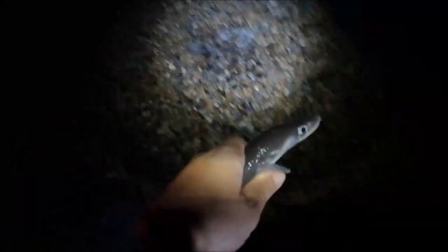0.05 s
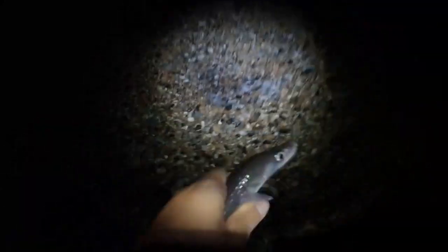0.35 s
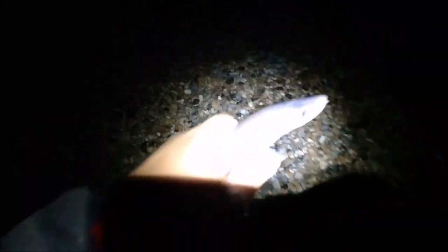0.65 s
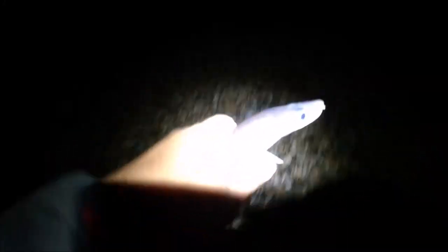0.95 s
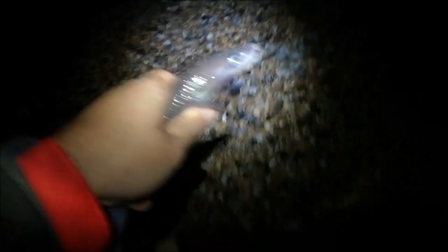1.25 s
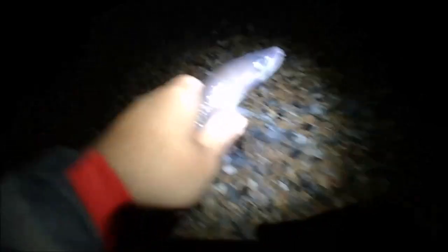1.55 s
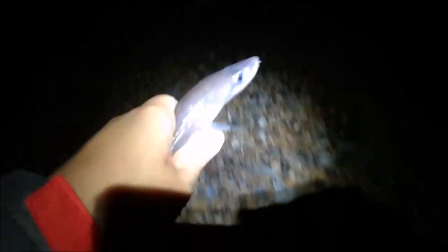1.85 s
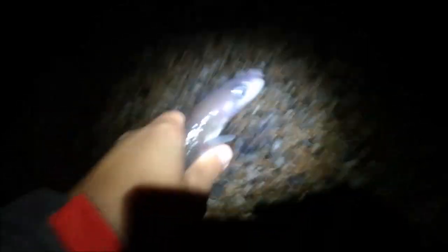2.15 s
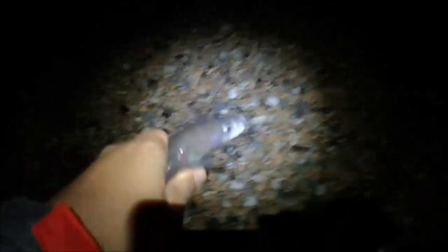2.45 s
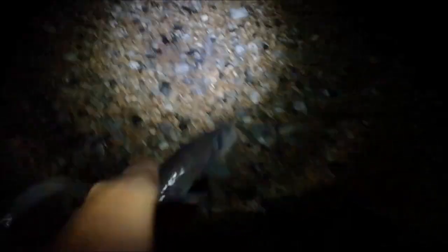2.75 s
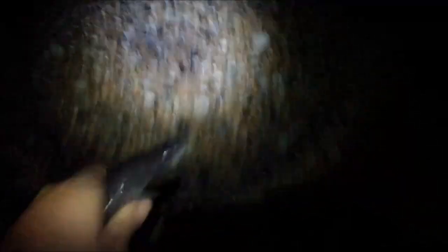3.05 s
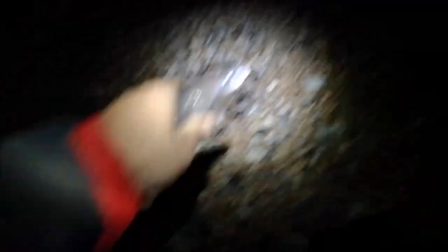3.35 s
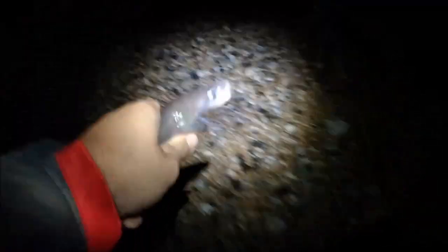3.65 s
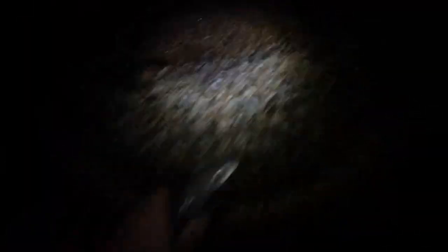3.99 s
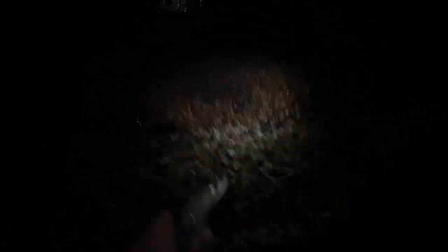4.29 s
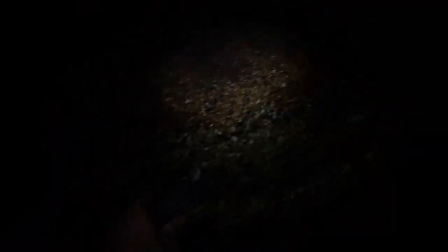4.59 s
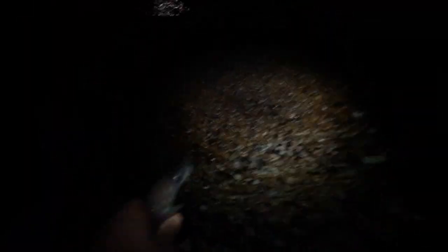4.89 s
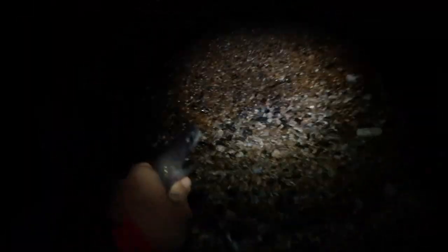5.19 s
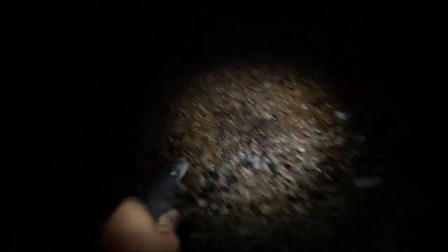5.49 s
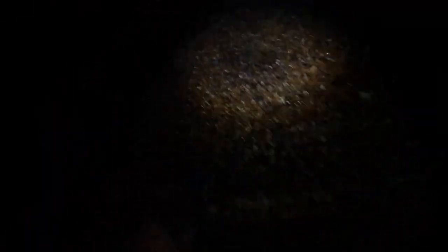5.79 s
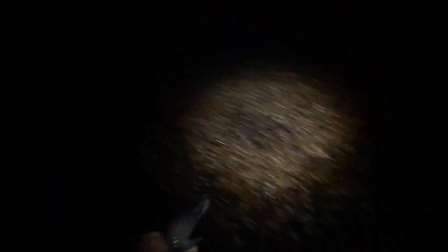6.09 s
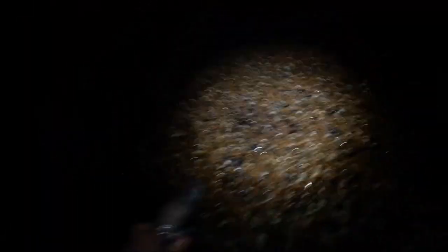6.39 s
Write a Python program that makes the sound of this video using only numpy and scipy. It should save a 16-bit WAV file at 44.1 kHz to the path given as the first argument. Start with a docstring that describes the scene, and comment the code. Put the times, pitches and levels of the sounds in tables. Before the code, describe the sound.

Footsteps crunch on a loose pebble beach, close to the microphone, for about six and a half seconds. There are eleven steps, at roughly 0.2, 0.9, 1.3, 1.8, 2.4, 3.0, 3.6, 4.1, 4.7, 5.4 and 6.0 seconds, gradually slower and a little lighter. Each is a gritty crunch over a soft low thud. Single stones clack sharply, most clearly around 0.2, 1.2, 1.9 and 2.4 seconds, and again near 4.6. Soles scuff between steps, especially around 2.5 and 3.1 seconds, and tiny stones tick faintly as they settle early on. Further off, a soft wave drains during the first two seconds, leaving a hiss in the shingle. From about 3.5 seconds the next wave builds, reaching a fuller wash with a low roar near 6 seconds. One brief, faint puff of wind rumbles on the microphone at about 5.8 seconds.

```python
"""A shingle beach at night: someone walks eleven steps, slowing down.
Each footfall loads a granular bed, whose many slipping contacts sum to a crunch over a low thud.
Single stones, kicked or settling, ring on impact; others rasp by friction under the sole.
Behind, the sea hisses through the shingle as one wave drains and the next builds up.
One puff of wind rumbles on the microphones."""
import sys
import numpy as np
from scipy import signal
from scipy.fft import rfft, irfft, next_fast_len
from scipy.io import wavfile

SR = 44100
rng = np.random.default_rng(int(sys.argv[2]) if len(sys.argv) > 2 else 0)


def persist_wave(psi):
    """Save psi, clipped to +-1, as 16-bit WAV."""
    counts = np.round(np.clip(psi, -1, 1) * 32767).astype(np.int16)
    wavfile.write(sys.argv[1], SR, np.atleast_2d(counts).T)


N = 283695
TIME = np.arange(N) / SR


# footfalls: (time [s], heel rise [s], heel level [dB], time to full weight [s], full weight [dB],
# fade [dB/s], time to rest [s], fine grit [dB], bed thud [dB], big pebbles [dB])
FOOTFALLS = [(0.159, 0.0045, -31, .03, -27.5, 41, 0.33, 8.5, 1.5, -2),
             (0.883, .003, -29.5, .043, -21, 268, 0.066, 8.5, 4, 2),
             (1.301, 0.022, -25, 0.094, -21.5, 135, 0.19, 5.5, 3, -0.5),
             (1.843, 0.0224, -28.5, .052, -21, 71, 0.11, 0, 2.5, 3),
             (2.363, 0.0018, -28.5, 0.0157, -23.5, 28, 0.065, -6, -0.5, 0.5),
             (3.026, 0.014, -31, 0.093, -27, 45, .145, 2, 0.5, 1),
             (3.584, 0.0039, -36.5, 0.063, -25.5, 188, 0.2, 7.5, 6, 2.5),
             (4.094, .002, -33.5, 0.11, -33.5, 15, 0.22, 14, 8.5, 3.5),
             (4.745, 0.021, -36.5, 0.084, -27, 30, 0.21, 10.5, 4, 3),
             (5.368, 0.01, -42, 0.12, -30.5, 45, 0.2, 12, 6.5, 1),
             (6.023, 0.0055, -33.5, 0.069, -26.5, 29, 0.15, 2.5, 3, -3)]
# a foot grazes, slips or pushes off: (centre time [s], level [dB], spread [s], fine grit [dB])
FOOT_SCUFFS = [(0.705, -41.5, 0.022, 0), (0.805, -36, 0.052, -10.5), (0.862, -32, 0.011, 10),
               (1.085, -57, 0.017, -2), (1.57, -38, 0.034, -6.5), (1.691, -37.5, 0.046, -4),
               (2.356, -32.5, .004, -6), (2.519, -25.5, 0.044, -8.5), (2.63, -40.5, 0.041, -11),
               (2.99, -40, 0.024, -11), (3.103, -23, 0.01, 0), (3.243, -29.5, 0.014, -5),
               (3.51, -41.5, .05, -4.5), (4.41, -43.5, 0.017, 5), (4.69, -43.5, 0.059, -11)]
def tread(settle_db=-16.5, settle_db_per_s=59.5, rest_db_per_s=173, grit_db_per_s=43.5):
    """Incoherent sources add in power: steps and scuffs give the crunch level and its grit share in dB."""
    moves = [(from_db(db) * swell(s, spread_s), grit_db) for s, db, spread_s, grit_db in FOOT_SCUFFS]
    for s, bite_s, heel_db, roll_s, weight_db, fade_db_per_s, rest_s, grit_db, _, _ in FOOTFALLS:
        age = np.maximum(TIME - s, 0)
        press_db = np.interp(age, [bite_s, roll_s], [heel_db, weight_db])
        loaded, resting = np.maximum(age - roll_s, 0), np.maximum(age - rest_s, 0)
        sole = from_db(press_db - fade_db_per_s * loaded - rest_db_per_s * resting)
        settling = from_db(press_db + settle_db - settle_db_per_s * loaded)
        bite = np.minimum(age / bite_s, 1)
        crushed_db = grit_db_per_s * np.minimum(age, rest_s)   # fine grit is crushed first
        moves.append((bite * np.hypot(sole, settling), grit_db - crushed_db))
    crunch_db = 10 * np.log10(sum(level ** 2 for level, _ in moves) + 1e-12)
    fine_db = 10 * np.log10(sum((level * from_db(grit_db)) ** 2 for level, grit_db in moves) + 1e-12)
    return crunch_db, fine_db - crunch_db


def contacts(crunch_db, per_s, size_db):
    """Slips form a Poisson process of even power, denser under load; many are small and few large."""
    rate = per_s * from_db((crunch_db + 29) * .7)
    sizes = from_db(size_db * np.minimum(rng.exponential(1, N), 3))
    slips = rng.random(N) < rate / SR
    return rms_one(slips * sizes / np.sqrt(rate))


# spectrum of crushed shingle: (frequency [Hz], relative density [dB])
CRUNCH_SPECTRUM = [(40, -28.5), (90, -28.5), (178, -12), (270, -16.5), (510, -17.5), (880, -10),
                   (2000, -6.5), (3100, -7), (3950, -2), (5100, -4.5), (8000, -11.5), (11000, -21.5),
                   (13500, -19.5), (16000, -18)]
# highest treble of the crunch: (time [s], gain [dB])
CRUNCH_TREBLE = [(3.1, -2), (4.8, 3.5)]
# ground sound at the two microphone ports: (frequency [Hz], left minus right [dB])
GROUND_BALANCE = [(280, -1), (720, 11), (1300, 7), (2200, 5), (3150, 0.5), (3950, 4.5), (5050, -9),
                  (7500, 8), (9200, 6), (10800, 3), (15500, 8.5)]
def footsteps(crunch_db, grit_db, scatter_db=2.5):
    """Brief impacts excite a broad spectrum: grit adds treble, big pebbles mids, the bed a thud."""
    thud_db, pebble_db = in_time([(s, thud, pebble) for s, *_, thud, pebble in FOOTFALLS])
    top_db, = in_time(CRUNCH_TREBLE)
    light_db = 0.33 * np.minimum(crunch_db + 57, 0)   # a light touch leaves the deep, big stones at rest
    clicks = contacts(crunch_db, per_s=2000, size_db=1.5) * from_db(0.72 * drift(170))
    spray = from_db(scatter_db) * scatter(clicks, t60=.035)
    drives = [np.hypot(clicks, spray) * rng.standard_normal((2, N)) for _ in range(3)]
    bands_hz = 1000 * 2 ** (np.arange(-14, 13) / 3)   # third octaves
    out = np.zeros((2, N))
    for k, (hz, gain) in enumerate(zip(bands_hz, band_gains(CRUNCH_SPECTRUM, bands_hz))):
        grit = at_hz([(4200, 0), (12000, 0.94), (16000, 0.7)], hz) * grit_db
        pebble = at_hz([(400, 0.24), (900, 0.41), (2100, 1), (3600, 0.01)], hz) * pebble_db
        thud = at_hz([(400, 1.0), (900, 0)], hz) * thud_db
        light = at_hz([(250, 0), (500, 1), (800, 1), (1600, 0)], hz) * light_db
        top = at_hz([(10000, 0), (14000, 1)], hz) * top_db
        level = gain * from_db(crunch_db + grit + pebble + thud + light + top)
        band = rms_one(band_pass(drives[k % len(drives)], hz, hz / 4, order=3))
        out += level * at_ports(band, hz, GROUND_BALANCE)
    return out


def clacks(crunch_db, level_db=-13.0, width_hz=330, count=16):
    """Damped resonance: within each crunch, pebbles ring for milliseconds, each at its own pitch."""
    clicks = contacts(crunch_db, per_s=300, size_db=2.0) * rng.choice([-1, 1], (2, N))
    struck = rng.integers(0, count, N)
    pitches_hz = np.geomspace(2700, 5200, count)
    rings = sum(band_pass(clicks * (struck == k), hz, width_hz) for k, hz in enumerate(pitches_hz))
    return from_db(crunch_db + level_db) * rms_one(rings)


# single stones knocking together: (time [s], level [dB], pitch [Hz])
STONE_KNOCKS = [(0.1617, -20, 4120), (0.2094, -14.5, 4000), (0.4539, -30, 3660), (0.5676, -28, 4070),
                (0.597, -29.5, 3900), (0.857, -36, 4250), (0.8884, -33, 4150), (1.0555, -31.5, 3800),
                (1.2203, -12.5, 3620), (1.2334, -29, 4000), (1.282, -22, 3840), (1.5924, -27.5, 3830),
                (1.8612, -14.5, 4060), (1.8801, -22, 3880), (1.8944, -11, 4000), (2.3727, -15.5, 4090),
                (2.3894, -16, 3870), (2.4094, -14.5, 3800), (2.7897, -30.5, 4000), (3.0353, -22, 3950),
                (4.0961, -31, 3900), (4.577, -18.5, 3790), (4.6657, -25, 3920)]
def stones(ring_db=-2.5, crack_db=-1.5, spray_db=-1.0):
    """Impact excitation: a chattering contact cracks and rings a stone, and the bed reflects the sound."""
    out, size = np.zeros((2, N)), SR // 16
    click = signal.unit_impulse(size)
    contact = scatter(click, t60=.007)
    spray = from_db(spray_db) * scatter(click, t60=.052)
    for s, level_db, hz in STONE_KNOCKS:
        drive = np.hypot(contact, spray) * rng.standard_normal((2, size))
        ring = band_pass(click + drive, hz, width_hz=700)
        crack = band_pass(drive, hz=4500, width_hz=4400, order=1)
        crack = band_pass(crack, hz=9500, width_hz=17000)
        knock = from_db(ring_db) * peak_one(ring) + from_db(crack_db) * peak_one(crack)
        start = round(s * SR)
        out[:, start:start + size] += from_db(level_db) * knock
    return out


# stones rasping underfoot: (centre time [s], left level [dB], pitch [Hz], bandwidth [Hz], spread [s])
STONE_RASPS = [(.348, -39, 12300, 500, 0.0027), (0.374, -36, 12000, 500, 0.0027),
               (0.688, -36, 12000, 500, 0.0024), (2, -40, 14500, 1790, 0.0088),
               (2.468, -44, 11300, 251, .007), (4.807, -26.5, 2050, 200, 0.013),
               (6.11, -32, 1000, 400, 0.018)]
def scrapes(right_db=-6.0):
    """Sliding friction: a stone dragged over its neighbours rasps in one band, swelling and fading."""
    out, size = np.zeros((2, N)), SR // 4
    for s, level_db, hz, width_hz, spread_s in STONE_RASPS:
        envelope = signal.windows.gaussian(size, spread_s * SR)
        rasp = rms_one(band_pass(rng.standard_normal((2, size)), hz, width_hz))
        start = round(s * SR) - size // 2
        out[:, start:start + size] += from_db(level_db) * envelope * rasp
    return out * from_db([[0], [right_db]])


# heels and soles bumping on the bed: (time [s], peak level [dB])
BED_THUMPS = [(0.168, -61), (0.954, -40), (1.315, -43), (1.391, -48), (1.94, -46), (2.368, -43),
              (3.099, -48), (3.582, -40.5), (3.623, -39), (3.705, -49), (4.092, -48)]
def thumps(hz=172, width_hz=130):
    """Heavy damping: the impulse response of the packed bed lasts two or three low cycles."""
    out, size = np.zeros(N), SR // 8
    bump = peak_one(band_pass(signal.unit_impulse(size), hz, width_hz))
    for s, peak_db in BED_THUMPS:
        start = round(s * SR)
        out[start:start + size] += from_db(peak_db) * bump
    return out


def trickle(per_s=24, level_db=-56, t60=0.023, hz=7000, width_hz=4500, middle_s=0.55, spread_s=0.85):
    """Granular relaxation: during the first steps, small disturbed stones tick into place."""
    ticks = (rng.random(N) < per_s / SR) * from_db(rng.uniform(-17.5, 0, N))
    ticking = band_pass(scatter(ticks, t60) * rng.standard_normal((2, N)), hz, width_hz)
    return from_db(level_db) * swell(middle_s, spread_s) * rms_one(ticking)


# one wave draining and the next building: (time [s], roar [dB], wash [dB], hiss [dB])
SURF_LEVELS = [(0.07, -63, -46, -49.5), (0.59, -67.5, -45.5, -49.5), (1.15, -69, -51.5, -43.5),
               (2.21, -72, -64, -42.5), (2.84, -77, -70, -40.5), (3.40, -62.5, -56, -37.5),
               (3.94, -59, -46, -38), (5.14, -52, -46, -37.5), (5.83, -43.5, -37.5, -37),
               (6.35, -42.5, -42, -38)]
# spectra of the breaker, the wash and water in the shingle: (frequency [Hz], relative density [dB])
ROAR_SPECTRUM = [(25, -19), (70, -10), (170, 0.5), (300, 4.5), (500, -3.5), (800, 0), (4000, -79),
                 (16000, -70)]
WASH_SPECTRUM = [(25, -47), (430, -22), (620, -9), (790, -3), (1100, 0.5), (1600, 1), (2600, -13.5),
                 (6000, -12.5), (10000, -33), (16000, -25)]
HISS_SPECTRUM = [(25, -30), (680, -31.5), (880, -18), (1250, -5.5), (1750, -3), (2070, 0), (2450, -1),
                 (3200, -5.5), (4000, -6.5), (6000, -15), (10000, -31.5), (16000, -35.5)]
def sea():
    """Superposition: far surf merges into smooth noise, a low roar, a middle wash and a draining hiss."""
    layers = zip((ROAR_SPECTRUM, WASH_SPECTRUM, HISS_SPECTRUM), in_time(SURF_LEVELS))
    return sum(from_db(level_db) * flow_noise(spectrum) for spectrum, level_db in layers)


# spectrum of air moving over the microphones: (frequency [Hz], relative density [dB])
WIND_SPECTRUM = [(25, -1), (45, 12.5), (80, 5), (160, 8), (400, -43), (16000, -90)]
def wind(air_db=-73.5, gust_db=-46, gust_s=5.83, spread_s=0.031):
    """Turbulent pressure on the microphones: a faint rumble with one puff."""
    level = from_db(air_db) + from_db(gust_db) * swell(gust_s, spread_s)
    return level * flow_noise(WIND_SPECTRUM)


# sea and wind at the two microphone ports: (frequency [Hz], left minus right [dB])
FLOW_BALANCE = [(500, 0), (750, 1.5), (1050, 0), (1500, 5.5), (2150, 6.5), (3100, 0.5), (4000, -5),
                (5100, -6.5), (8000, -0.5), (15500, 4)]
def flow_noise(spectrum, waver_db=1.05):
    """Spectral shaping: white noise takes the colour of moving water or air, and its level wavers."""
    waver = from_db(waver_db * drift(25))
    size = next_fast_len(N)
    hz = np.maximum(np.fft.rfftfreq(size, 1 / SR), 1)
    pair = rfft(rng.standard_normal((2, size))) * from_db(at_hz(spectrum, hz))
    noise = irfft(at_ports(pair, hz, FLOW_BALANCE), size)[:, :N]
    return waver * rms_one(noise)


# likeness of the sound at the two ports: (frequency [Hz], correlation [1])
PORT_COHERENCE = [(200, 0.9), (340, 0.61), (550, 0), (850, 0.0061), (1300, 0.2), (2000, 0.033), (4000, 0),
                  (15000, 0)]
def at_ports(pair, hz, balance):
    """Partial coherence: two independent signals mix as mid and side into left and right."""
    alike = np.clip(at_hz(PORT_COHERENCE, hz), -.99, .99)
    ratio = from_db(at_hz(balance, hz))
    mid, side = np.sqrt(1 + alike) * pair[0], np.sqrt(1 - alike) * pair[1]
    return np.array([ratio * (mid + side), mid - side]) / np.hypot(1, ratio)


def scatter(clicks, t60):
    """Scattering off nearby stones spreads each click's energy into an exponentially decaying envelope."""
    keep = 10 ** (-6 / (t60 * SR))
    return np.sqrt(signal.lfilter([1 - keep], [1, -keep], clicks ** 2 + 1e-18))


def band_pass(x, hz, width_hz, order=2):
    """A resonant band around hz: the narrower it is, the longer it rings."""
    edges = np.clip([hz - width_hz / 2, hz + width_hz / 2], 10, .45 * SR)
    return signal.sosfilt(signal.butter(order, edges, "band", fs=SR, output="sos"), x + 1e-18)


def band_gains(spectrum, bands_hz):
    """Band power is density times bandwidth; the gains give unit total power."""
    gains = from_db(at_hz(spectrum, bands_hz)) * np.sqrt(bands_hz)
    return gains / np.linalg.norm(gains)


def drift(per_s):
    """Random modulation of unit power, linear between per_s values a second."""
    knots = rng.standard_normal(4000)
    return rms_one(np.interp(TIME * per_s, np.arange(len(knots)), knots))


def swell(middle_s, spread_s):
    """Gaussian envelope of height 1."""
    return np.exp(-.5 * ((TIME - middle_s) / spread_s) ** 2)


def in_time(rows):
    """Linear interpolation of each column over time."""
    s, *columns = np.transpose(rows)
    return [np.interp(TIME, s, column) for column in columns]


def at_hz(points, hz):
    """Interpolation on a log-frequency axis."""
    knots_hz, values = np.transpose(points)
    return np.interp(np.log(hz), np.log(knots_hz), values)


def from_db(db):
    """Decibels to amplitude ratio."""
    return 10 ** (np.asarray(db) / 20)


def rms_one(x):
    """Normalisation to unit power."""
    return x / np.sqrt(np.mean(x ** 2) + 1e-20)


def peak_one(x):
    """Normalisation to unit peak."""
    return x / np.abs(x).max()


def scene():
    """Sound pressures add: the feet close below, the sea further off, and the wind."""
    crunch_db, grit_db = tread()
    crunch = from_db(-2.0) * footsteps(crunch_db, grit_db) + clacks(crunch_db)
    feet = crunch + stones() + scrapes() + thumps() + trickle()
    return feet + from_db(-1.5) * (sea() + wind())


# modes of the microphone ports and case: (frequency [Hz], bandwidth [Hz], left [dB], right [dB])
PORT_RESONANCES = [(1980, 260, 2, 1), (3894, 260, 5.5, -2.5), (12000, 210, 0, -16)]
def record(dry, cutoff_hz=16000):
    """Port resonances lift or notch a few bands on each side; a steep low-pass cuts the top."""
    for hz, width_hz, left_db, right_db in PORT_RESONANCES:
        gain = from_db([[left_db], [right_db]])
        dry = dry + (gain - 1) * band_pass(dry, hz, width_hz, order=1)
    return signal.sosfilt(signal.ellip(12, .1, 80, cutoff_hz, fs=SR, output="sos"), dry)


dry = scene()
out = record(dry)
persist_wave(out)
```